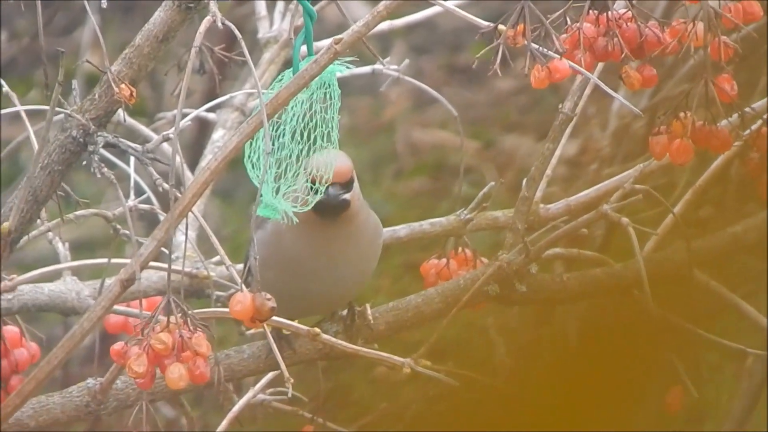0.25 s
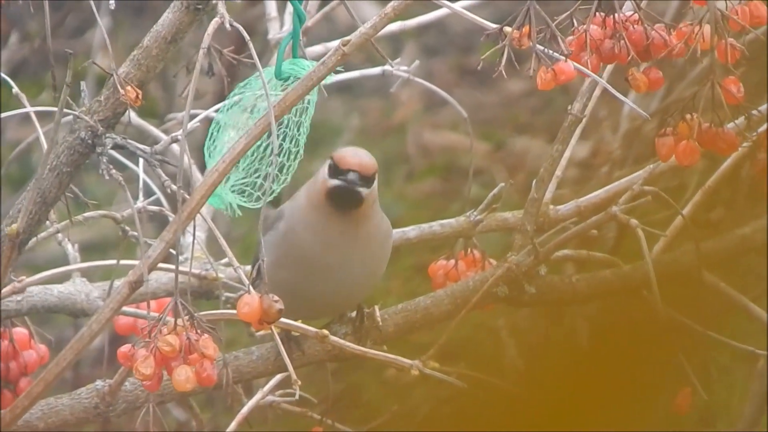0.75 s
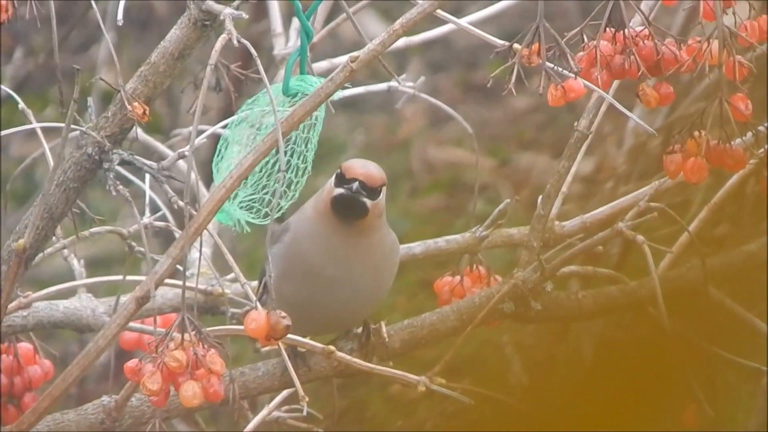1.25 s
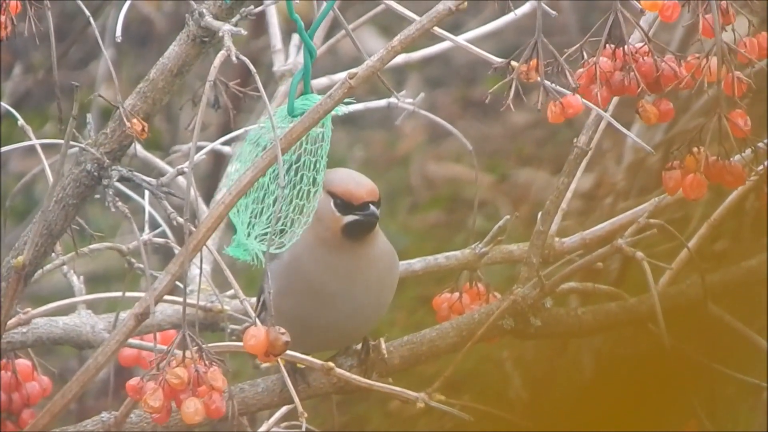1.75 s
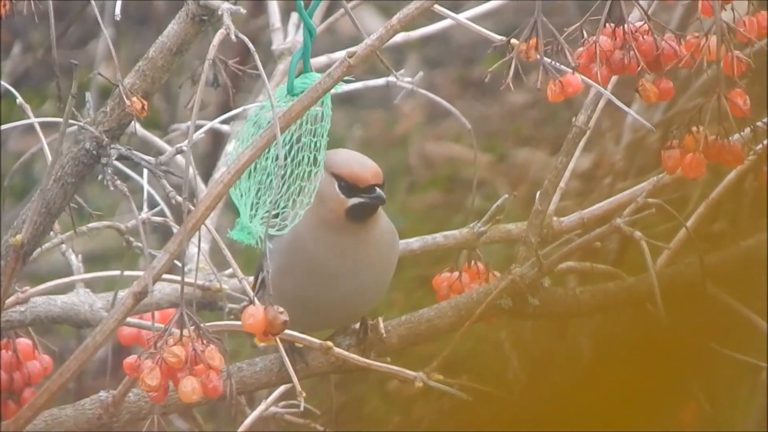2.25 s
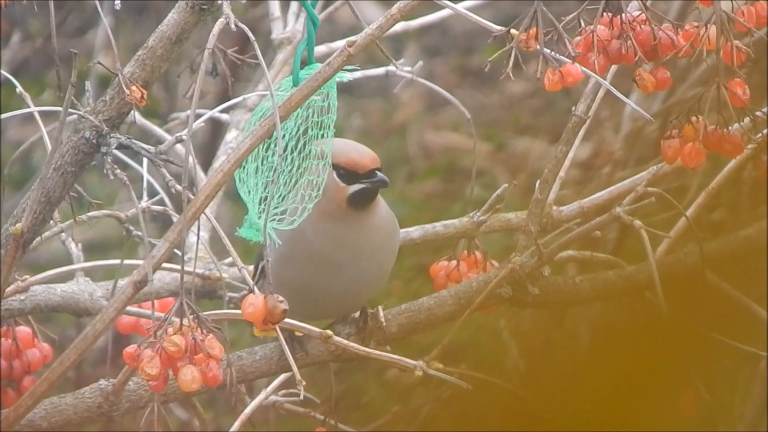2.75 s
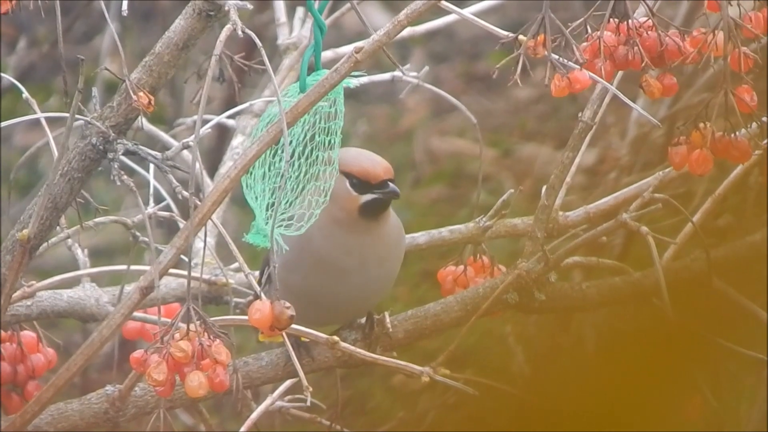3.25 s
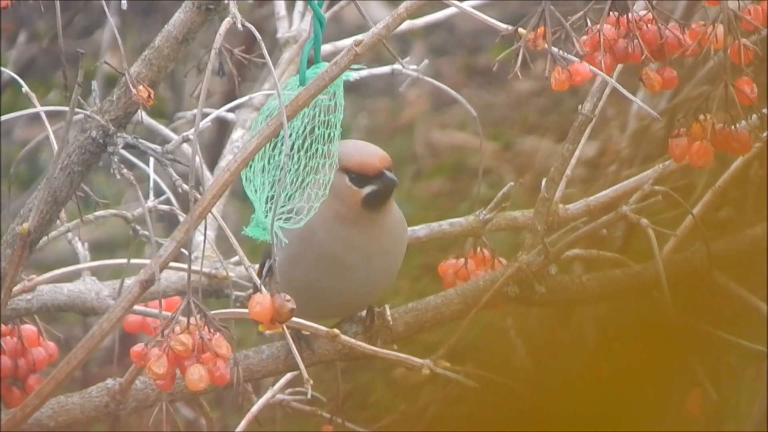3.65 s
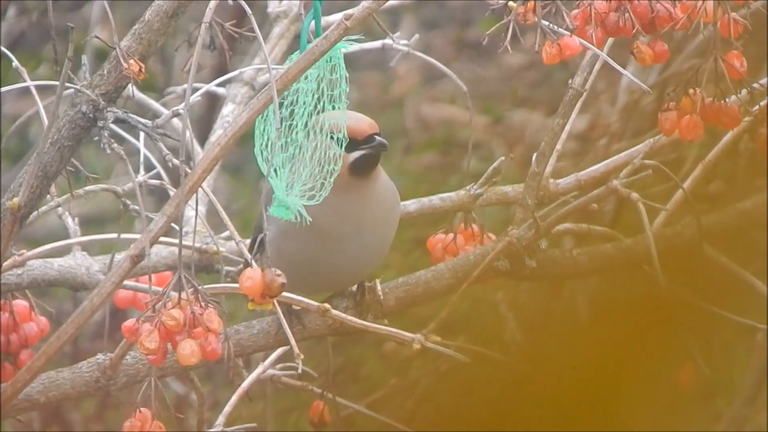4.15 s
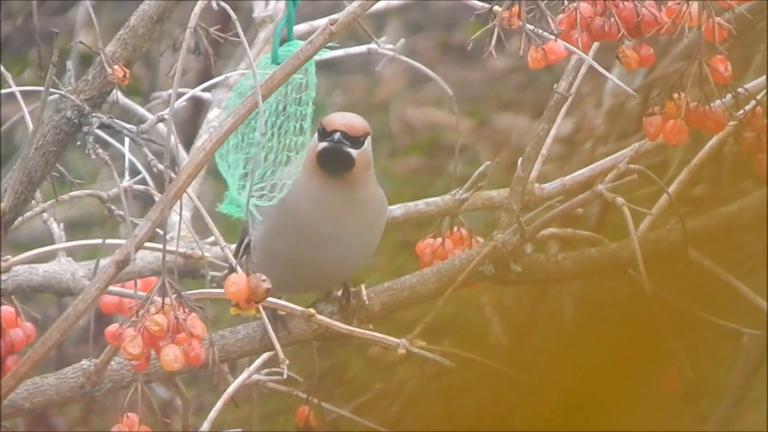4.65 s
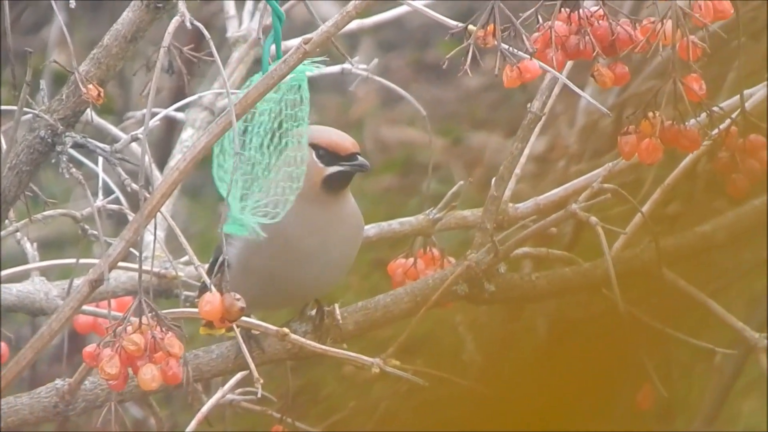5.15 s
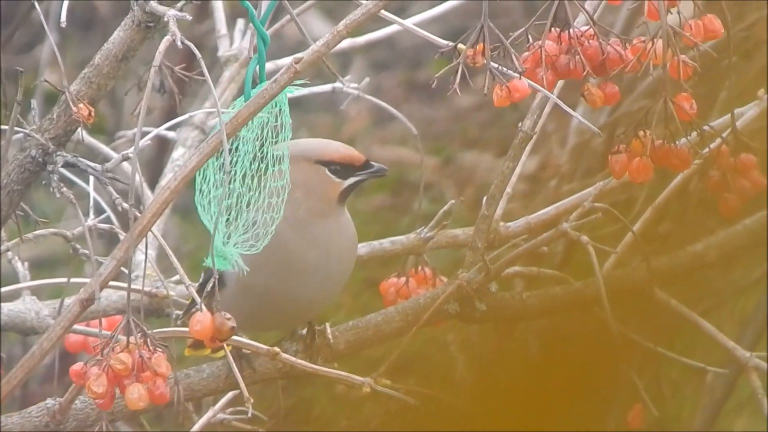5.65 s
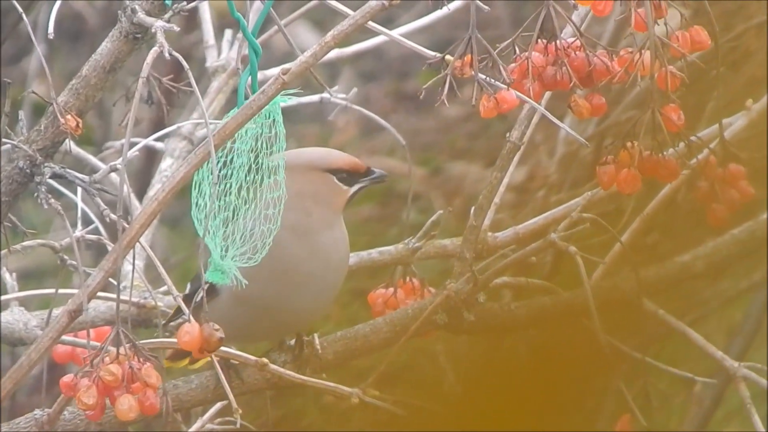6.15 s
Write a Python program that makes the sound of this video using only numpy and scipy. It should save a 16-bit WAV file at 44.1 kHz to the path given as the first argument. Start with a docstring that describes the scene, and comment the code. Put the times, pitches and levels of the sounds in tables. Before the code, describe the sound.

A small bird sings high ringing trills and two sharp chirps, with distant birds, light twig ticks and faint traffic rumble.

```python
"""A small bird by a feeder net in a berry bush sings two hooked high notes and a ringing trill, twice.
Each note is a nearly pure tone from its voice box, sliding in pitch. Between the songs come two
sharp rising chirps, and other birds whistle and buzz further off. Twigs and net tick and rustle,
the trees scatter every call, and distant traffic rumbles faintly underneath."""
import sys
import numpy as np
from scipy import signal
from scipy.fft import rfft, irfft
from scipy.io import wavfile
from scipy.ndimage import map_coordinates

SR = 44100
rng = np.random.default_rng(int(sys.argv[2]) if len(sys.argv) > 2 else 0)


def output_pcm(signal):
    """Save a mono or channel-first signal as 16-bit PCM at the path in sys.argv[1].

    Samples are clipped to [-1, 1] before scaling.
    """
    pcm = np.clip(np.atleast_2d(signal).T, -1, 1) * 32767
    wavfile.write(sys.argv[1], SR, np.round(pcm).astype(np.int16))


N = 282240
T = np.arange(N) / SR

# Distant traffic. Each row: time in seconds, base level of engines in dB, base level of tyres in dB.
TRAFFIC = [(0.0, -66.5, -63), (0.5, -67, -65), (0.82, -63.5, -63.5), (1.34, -68, -66.5),
           (1.48, -65.5, -64.5), (3.32, -69, -66), (5.37, -68.5, -66.5), (6.27, -65.5, -64),
           (6.4, -64.5, -64)]
# The tone colour of each noise. Each row: frequency in Hz, relative level in dB.
RUMBLE_COLOUR = [(25, -34.5), (40, -9), (52, -3.5), (66, 0), (80, -1), (100, 1), (127, -4.5), (155, -1.5),
                 (195, -5), (260, -19), (400, -23.5)]
TYRE_COLOUR = [(130, -7.5), (230, -5.5), (310, -6), (400, -3), (550, -1), (740, -2), (1000, -6.5),
               (1300, -13), (1700, -26.5), (2500, -46)]
AIR_COLOUR = [(1500, -8), (2000, -6), (2500, -1.5), (3300, -19.5), (4500, -4), (6500, -2), (8000, -2.5),
              (11300, -3), (12200, -8.5), (15500, -13)]
RUSTLE_COLOUR = [(1100, -9), (1600, -1), (2400, 2), (2900, -2), (3600, 2.5), (4800, 2.5), (7000, -4),
                 (9500, -16), (12000, -22.5), (15500, -27)]
KNOCK_COLOUR = [(700, -34.5), (1500, -4.5), (3500, 0.5), (6000, -9.5), (8000, -18.5)]
SNAP_COLOUR = [(3000, -25), (6000, -1), (9000, -3), (12000, -23), (15000, -31)]
RASP_COLOUR = [(1800, -14), (3300, 2), (6500, -6), (9000, -8), (13000, -17.5), (15500, -28)]
# Feathers and net stirring. Each row: peak time in seconds, level in dB, seconds to fade by 60 dB.
STIRS = [(.79, -69, 7), (1.167, -55, .4), (1.52, -59.5, 1.5), (1.94, -62, .5), (2.3, -69.5, 1.5),
         (3.36, -74.5, 2.5), (4.5, -81, 6), (6.1, -77, 1)]
# Taps on twigs. Each row: start in seconds, base level in dB, extra treble in dB.
TICKS = [(0.781, -58.5, 1), (.885, -54.5, -0.5), (0.971, -65, -5), (1.035, -58, -8), (1.21, -50, -7),
         (1.386, -53.5, -20), (1.5033, -51, -4), (1.7254, -46.5, -30), (1.925, -51, -8), (1.944, -49.5, 1),
         (1.99, -56.5, 5.5), (2.2906, -59, 2), (2.8212, -62, 7), (3.375, -53, -14.5), (3.585, -55, 8),
         (3.9504, -63, 9), (4.041, -61, -1), (4.1515, -66, 6), (4.301, -61.5, 0), (4.5047, -65.5, 5),
         (5.11, -63.5, 0), (5.241, -60, -21.5), (5.5212, -60, -15), (6.189, -58, -26.5)]
# Soft arched notes. Each row: time of the top in seconds, middle pitch in Hz, base level in dB.
ARCHES = [(1.341, 2870, -69.5), (1.424, 2900, -64.5), (1.513, 2900, -67.5), (1.604, 2782, -68),
          (1.699, 2760, -62.5), (1.796, 2880, -61.5), (1.895, 2934, -65.5), (5.841, 2950, -75),
          (5.925, 3000, -70), (6.011, 3000, -69.5), (6.098, 2930, -69.5), (6.195, 2835, -72),
          (6.296, 2900, -75)]
# Buzzy notes. Each row: start and length in seconds, middle pitch and slide in Hz, base level in dB,
# depth in the trees from 0 to 1.
BUZZES = [(0.04, 0.1074, 4410, 480, -64, 0.26), (0.025, .13, 2520, -400, -80.5, 1),
          (0.121, 0.35, 2890, -380, -89, 1), (2.297, 0.17, 6760, 119, -78.5, .9),
          (2.525, 0.41, 2556, 72, -88, 1), (3.231, 0.16, 5420, -390, -68, 0.82),
          (3.439, 0.34, 5210, 222, -69.5, 0.94), (4.147, 0.14, 5420, -360, -70, 0.85),
          (4.342, .15, 5520, -430, -72.5, .6), (4.564, .13, 5250, -480, -72, .6),
          (4.596, 0.17, 4050, -350, -78, .8), (4.836, .14, 6540, 247, -83.5, 0.76)]
# Short, high, falling calls. Each row: start in seconds, level in dB.
CHIPS = [(0.565, -72.5), (0.727, -73.5), (.88, -72.5), (2.711, -80), (2.857, -76.5), (2.994, -76),
         (4.105, -75)]
# Thin whistles. Each row: start and length in seconds, middle pitch and slide in Hz, level in dB.
WHISTLES = [(0.766, 0.173, 3680, 99, -70.5), (0.97, 0.0935, 7160, -170, -66), (2.137, .071, 4172, 180, -72),
            (2.219, 0.082, 3150, -120, -76.5), (2.381, .1, 4010, 39, -62.5),
            (2.465, 0.064, 3870, -100, -70), (3.008, .17, 7660, -4, -76), (3.378, 0.085, 4386, -440, -73.5),
            (3.886, .2, 7580, 188, -77), (5.192, .23, 4307, -550, -74.5), (5.457, 0.042, 3150, 13, -77.5)]
# Rising chirps. Each row: start and length of the clear tone in seconds, hoarse pitch in Hz,
# clear pitch in Hz, level of the clear tone in dB.
CHIRPS = [(3.594, 0.055, 2380, 4275, -37), (3.854, 0.051, 2394, 4233, -35.5)]
# A chirp's higher tones. Each row: multiple of the pitch, relative dB when clear, and when hoarse.
OVERTONES = [(1.5, -68, -2), (2, -63.5, 7), (2.5, -73.5, 5), (3, -40.5, -7), (3.5, -82, -10), (4, -66, -40)]
# Notes that open a song. Each row: time of the top in seconds, top pitch in Hz, level in dB.
HOOKS = [(1.532, 6823, -41.5), (1.647, 6736, -40.5), (5.773, 6810, -44.5), (5.883, 6750, -42)]
# Trill notes. Each row: time of the pitch dip in seconds, pitch there in Hz, level at the swell in dB.
TRILL = [(1.755, 4473, -41.5), (1.852, 4472, -38.5), (1.949, 4440, -37.5), (2.052, 4444, -39),
         (2.151, 4414, -40), (2.261, 4436, -40), (2.366, 4430, -40), (2.472, 4390, -39.5),
         (2.577, 4381, -41), (2.692, 4285, -40.5), (2.804, 4367, -39), (2.921, 4297, -40),
         (3.036, 4264, -40), (5.988, 4495, -44.5), (6.083, 4460, -40), (6.185, 4420, -42.5),
         (6.286, 4410, -40.5), (6.388, 4450, -37.5)]

CALL_BOW = 0.0317  # share of its pitch by which both ends of a far call sag


def undb(db):
    """Turn decibels into a volume factor."""
    return 10 ** (np.asarray(db) / 20)


def unit(x):
    """Scale a sound to an average (rms) strength of 1."""
    return x / np.sqrt(np.mean(x ** 2))


def colour(x, points):
    """Filter by (Hz, dB) points, falling 30 dB an octave beyond the ends; the strength becomes 1."""
    hz, db = np.transpose(points)
    octave = np.log2(np.maximum(np.fft.rfftfreq(len(x), 1 / SR), 1))
    outside = np.abs(octave - np.clip(octave, np.log2(hz[0]), np.log2(hz[-1])))
    gain = undb(np.interp(octave, np.log2(hz), db) - 30 * outside)
    return unit(irfft(rfft(x) * gain, len(x)))


def noise(points, n=N):
    """Noise with the given tone colour."""
    return colour(rng.standard_normal(n), points)


def wander(rate, n=N):
    """A smooth random curve, about 1 in size, that changes rate times a second."""
    knots = rng.standard_normal(int(n * rate / SR) + 2)
    return map_coordinates(knots, [np.arange(n) * rate / SR], order=3, mode="nearest")


def add(out, s, x):
    """Mix x in, starting at s seconds."""
    i = max(int(s * SR), 0)
    out[i:i + len(x)] += x[:max(N - i, 0)]


def ramp(t, length_s):
    """Rise from 0 at time zero to 1 after length_s."""
    return np.clip(t / length_s, 0, 1)


def fades(t, in_s, out_s):
    """Fade in, hold, and fade out."""
    return ramp(t - t[0], in_s) * ramp(t[-1] - t, out_s)


def swing(t, before_s, after_s):
    """A smooth turn: 1 before, 0 at time zero, 1 again after."""
    return np.sin(np.pi / 2 * (ramp(-t, before_s) + ramp(t, after_s))) ** 2


def phase_of(hz):
    """The running angle of a wave whose pitch moves."""
    return 2 * np.pi * np.cumsum(hz) / SR


def whistle(hz, db, jitter):
    """A nearly pure tone from a bird's voice box; the pitch trembles by the share jitter."""
    trembling_hz = hz * (1 + jitter * wander(521.7, len(hz)))
    return np.sqrt(2) * undb(db) * np.sin(phase_of(trembling_hz))


def slur(length_s, hz, slide_hz, bow, db, jitter, flutter=0, soft=0.36):
    """A note that swells and fades while its pitch slides along a bowed line."""
    u = np.linspace(-1, 1, int(length_s * SR))
    pitch = hz * (1 - bow * u ** 2) + slide_hz * u / 2 + flutter
    return signal.windows.tukey(len(u), soft) * whistle(pitch, db, jitter)


def trees(x, near_db, far_db, near_s=0.18, far_s=0.77):
    """Nearby trunks return a quick spray of echoes; the wood behind adds a longer, faint ring."""
    t = np.arange(SR) / SR
    spray = (rng.random(SR) < 500 / SR) * rng.standard_normal(SR) * (t > .005) * undb(-60 * t / near_s)
    ring = rng.standard_normal(SR) * ramp(t, 0.014) * undb(-60 * t / far_s)
    echoes = (undb(near_db) * unit(spray) + undb(far_db) * unit(ring)) / np.sqrt(SR)
    return x + signal.fftconvolve(x, echoes)[:N]


def echo(x, delay_s, db):
    """One distinct echo from a big surface a few metres behind the bird."""
    return x + undb(db) * np.interp(T - delay_s, T, x, left=0)


def traffic(drone_hz=125, whine_hz=550, whine_at_s=0.8, whine_width_s=0.41):
    """Distant engines rumble and drone; tyres make a soft rush and briefly whine."""
    times, *levels = np.transpose(TRAFFIC)
    engines_db, tyres_db = (np.interp(T, times, db) for db in levels)
    rumble = undb(engines_db - 1 + 0.99 * wander(6)) * noise(RUMBLE_COLOUR)
    rush = undb(tyres_db + 0.66 + .5 * wander(11)) * noise(TYRE_COLOUR)
    drone_db = -59.5 + 2.83 * (engines_db - engines_db.max())  # swells more steeply than the rumble
    drone = undb(drone_db + 2.9 * wander(28)) * np.sin(phase_of(drone_hz * (1 + 0.0694 * wander(30))))
    swell = np.exp(-((T - whine_at_s) / whine_width_s) ** 2)
    whine = undb(-66 + 6 * wander(29.3)) * np.sin(phase_of(whine_hz * (1 + 0.04 * wander(60))))
    return rumble + rush + drone + swell * whine


def air():
    """The air hisses faintly and evenly."""
    return undb(-79) * noise(AIR_COLOUR)


def rustle(scrapes_per_s=1500, rest_db=-84.5, rise_s=0.051):
    """Feathers and net make tiny scrapes over a soft brushing; each stir swells and settles unevenly."""
    sizes = undb(2 * np.minimum(rng.exponential(size=N), 2))
    scrapes = (rng.random(N) < scrapes_per_s / SR) * rng.standard_normal(N) * sizes
    power = undb(rest_db) ** 2
    for s, db, fade_s in STIRS:
        stir = np.exp(np.minimum((T - s) / rise_s, np.log(1000) * (s - T) / fade_s))
        power = power + (undb(db) * stir) ** 2
    level = np.sqrt(power) * undb(3.5 * wander(70))
    brushing = 0.93 * rng.standard_normal(N)
    return level * colour(unit(scrapes) + brushing, RUSTLE_COLOUR)


def ticks(rise_s=0.00074, decay_s=0.0053):
    """Beaks and claws tap on twigs: a very short woody knock with a brighter snap."""
    out = np.zeros(N)
    t = np.arange(2048) / SR
    tap = ramp(t, rise_s) * np.exp(-t / decay_s)
    for s, db, treble_db in TICKS:
        knock = undb(-3) * noise(KNOCK_COLOUR, len(t))
        snap = undb(treble_db - 6) * noise(SNAP_COLOUR, len(t))
        add(out, s, undb(db) * tap * (knock + snap))
    return out


def arches(length_s=.064, lead_s=.038):
    """A distant bird repeats one arched note about eleven times a second, scooping up from below."""
    out = np.zeros(N)
    for s, hz, db in ARCHES:
        note = slur(length_s, hz, slide_hz=400, bow=0.219, db=db - 1.5, jitter=0.023, soft=0.4222)
        add(out, s - lead_s, note)
    return out


def buzzes(flutter_hz=400, depth_hz=350, chatter_per_s=3.6, low_hz=3520, high_hz=5158.4):
    """A fast flutter of pitch makes notes buzz; the deeper in the trees, the more ragged and echoing."""
    near, far = np.zeros((2, N))
    # the flock's faint chatter: extra rows with random times and pitches
    chatter = [(when * N / SR, 0.2, low_hz + height * (high_hz - low_hz), 0, -87, 1)
               for when, height in rng.random((int(chatter_per_s * N / SR), 2))]
    for s, length_s, hz, slide_hz, db, away in BUZZES + chatter:
        rate_hz = flutter_hz * (1 + 0.13 * away * wander(200, int(length_s * SR)))
        flutter = depth_hz * np.sin(phase_of(rate_hz))
        note = slur(length_s, hz, slide_hz, CALL_BOW, db, jitter=.035 * away, flutter=flutter)
        add(near, s, (1 - away) * note)
        add(far, s, away * note)
    return near + trees(far, near_db=-8, far_db=0.5)


def flock_calls():
    """Birds further off give short falling chips and thin curved whistles."""
    out = np.zeros(N)
    for s, db in CHIPS:
        add(out, s, slur(length_s=0.04, hz=6900, slide_hz=-950, bow=CALL_BOW, db=db, jitter=0.0065))
    for s, length_s, hz, slide_hz, db in WHISTLES:
        add(out, s, slur(length_s, hz, slide_hz, CALL_BOW, db, jitter=.006))
    return out


def chirp_voice(phase, hoarse, warble):
    """A tone with overtones. When hoarse, every second wave differs, which adds in-between tones."""
    voice = np.sin(phase)
    for multiple, clear_db, hoarse_db in OVERTONES:
        share = hoarse if multiple == 2 else hoarse ** 3  # the octave fades more slowly
        gain = undb(clear_db) * (1 - warble) + share * undb(hoarse_db)
        voice += gain * np.sin(multiple * phase)
    return voice


def chirps(hoarse_s=.031, climb_s=.029, start_db=-60, warble_hz=180, warble_fade_s=0.0086):
    """A hoarse start warbles upward with a rasp, grows louder, and locks into a clear ringing tone."""
    out = np.zeros(N)
    for s, length_s, low_hz, clear_hz, db in CHIRPS:
        t = np.arange(-hoarse_s, climb_s + length_s, 1 / SR)  # zero where the climb begins
        climb = ramp(t, climb_s)
        hoarse = 1 - ramp(t, 0.019)
        warble = ramp(t, warble_fade_s) * ramp(climb_s + warble_fade_s / 2 - t, warble_fade_s)
        start_hz = low_hz + 4000 * (np.minimum(t, 0) + hoarse_s / 2)  # creeps up before the climb
        held_hz = clear_hz - 110 * ramp(t - t[-1] + .006, .006)  # drops at the very end
        hz = start_hz * (held_hz / start_hz) ** climb
        hz += 287.04 * warble * np.sin(2 * np.pi * warble_hz * t)
        hz += 13.7 * wander(96.6, len(t)) + (8 + 22 * hoarse) * wander(700, len(t))
        voice = chirp_voice(phase_of(hz), hoarse, warble)
        rasp = undb(-27) * warble * noise(RASP_COLOUR, len(t))
        level_db = start_db + (db - start_db) * ramp(climb, .85) ** 1.14 + 1.6 * wander(97, len(t))
        level = np.sqrt(2) * undb(level_db) * fades(t, in_s=0.02, out_s=0.0033)
        add(out, s - climb_s + t[0], level * (voice + rasp))
    return out


def hooks(up_s=.013, down_s=.036, drop_share=0.17573, flick_lead_s=.022):
    """A quick rise and a long slide down, led by a faint upward flick from the voice box's other side."""
    out = np.zeros(N)
    t = np.arange(-up_s, down_s + 0.0014, 1 / SR)
    for s, top_hz, db in HOOKS:
        hz = top_hz * (1 - drop_share * swing(t, up_s, down_s))
        add(out, s + t[0], whistle(hz, db, jitter=.009) * fades(t, in_s=0.02194, out_s=0.005))
        flick = slur(length_s=0.02, hz=6400, slide_hz=3000, bow=.13, db=db - 17, jitter=.009)
        add(out, s - flick_lead_s, flick)
    return out


def trill(aim_hz=4884, reach=0.6005, swell_db=6.5, swell_at_s=0.028, swell_width_s=0.016):
    """Each note starts abruptly, dips in pitch, then swells and flutters as it climbs towards aim_hz."""
    out = np.zeros(N)
    t = np.arange(-.014, 0.051, 1 / SR)  # zero at the dip
    climb = reach * swing(t, before_s=0.0224, after_s=0.0388)
    shape_db = swell_db * (np.exp(-((t - swell_at_s) / swell_width_s) ** 2) - 1)
    for s, dip_hz, db in TRILL:
        hz = dip_hz + (aim_hz - dip_hz) * climb
        flutter_db = 2.54 * wander(150, len(t))
        note = whistle(hz, db + shape_db + flutter_db, jitter=.002)
        add(out, s + t[0], note * fades(t, in_s=0.0074, out_s=.008))
    return out


def scene():
    """Mix the birds, the bush and the background; birds further off get more echo."""
    song = trees(echo(trill(), delay_s=.027, db=-17), near_db=-6.5, far_db=-13)
    song += trees(hooks(), near_db=-7, far_db=-13.5)
    calls = trees(echo(chirps(), delay_s=.047, db=-18), near_db=-9, far_db=-16.5)
    flock = trees(flock_calls(), near_db=2, far_db=-4)
    distant = buzzes() + trees(arches(), near_db=-4, far_db=-5)
    bush = trees(ticks() + rustle(), near_db=-9, far_db=-21.5)
    return (song + calls + flock + distant + bush + traffic() + air())[None]


def record(dry):
    """Cut away the highest treble, above 15700 Hz."""
    return signal.sosfilt(signal.ellip(10, .2, 70, 15700, fs=SR, output="sos"), dry)


dry = scene()
out = record(dry)
output_pcm(out)
```